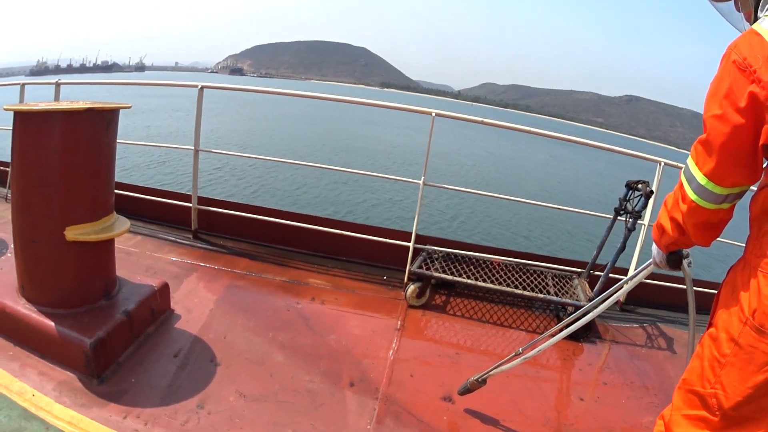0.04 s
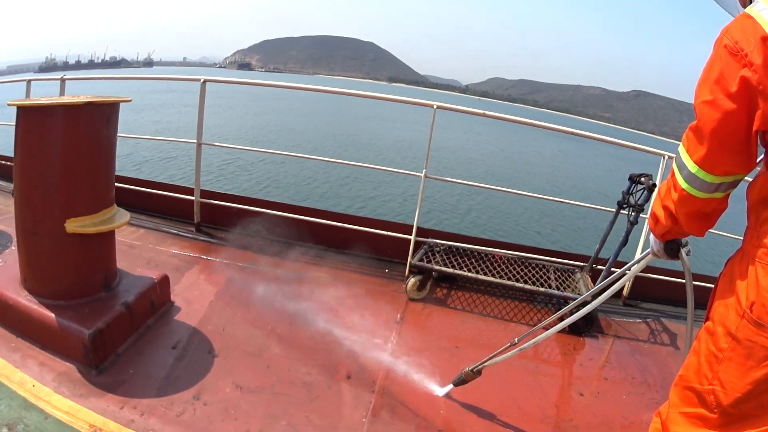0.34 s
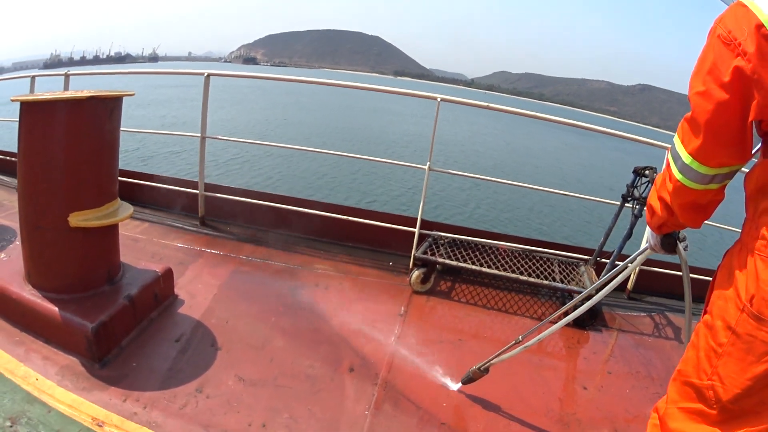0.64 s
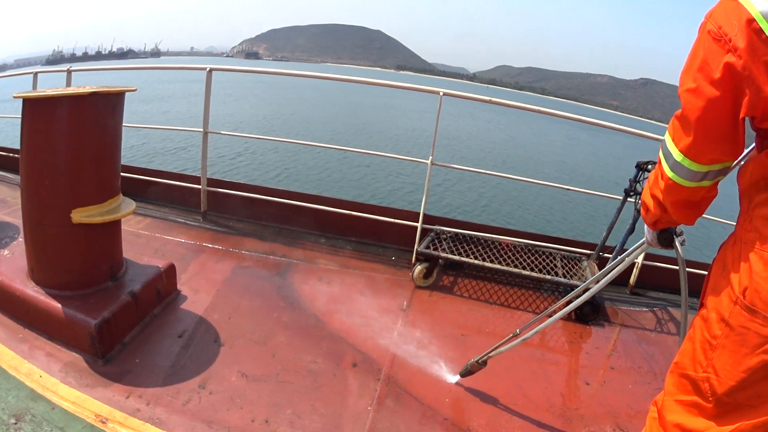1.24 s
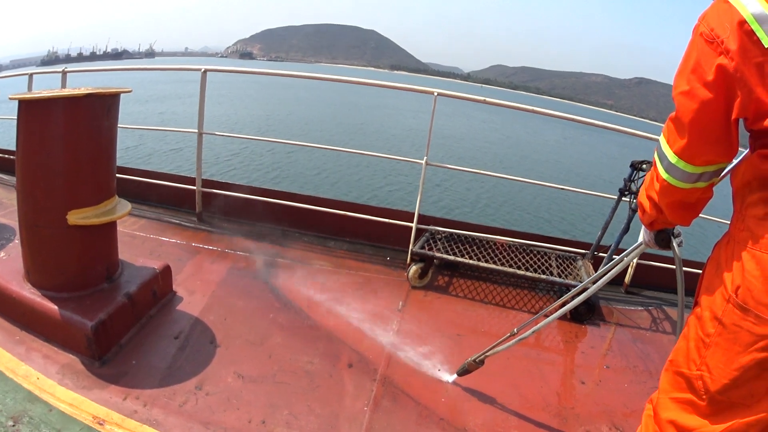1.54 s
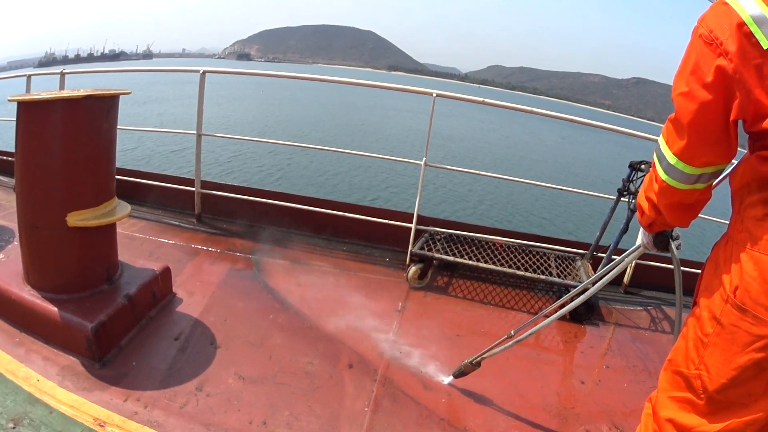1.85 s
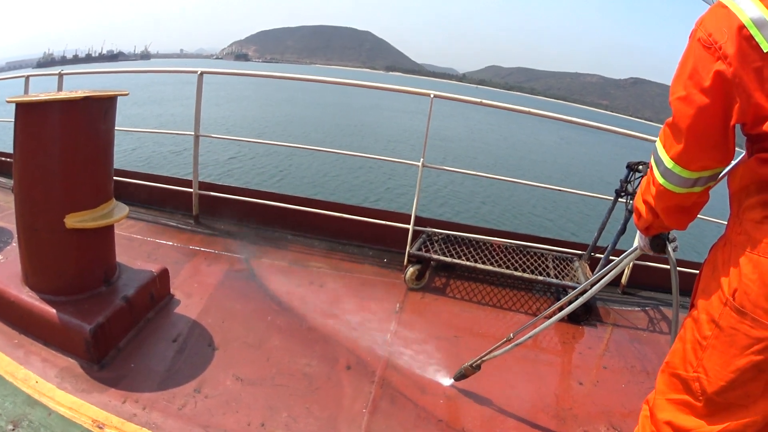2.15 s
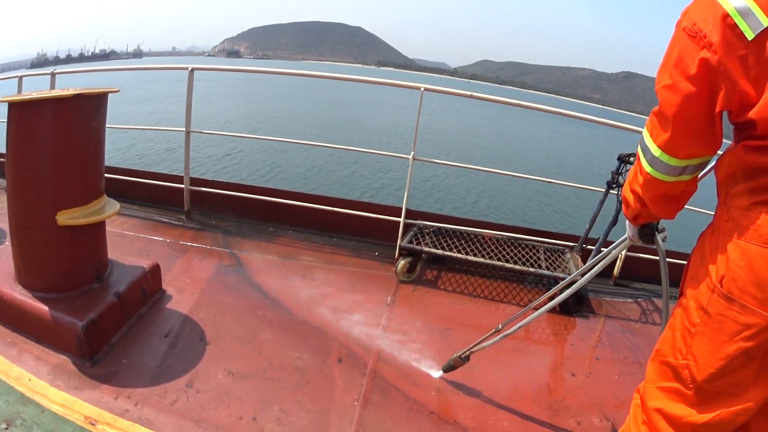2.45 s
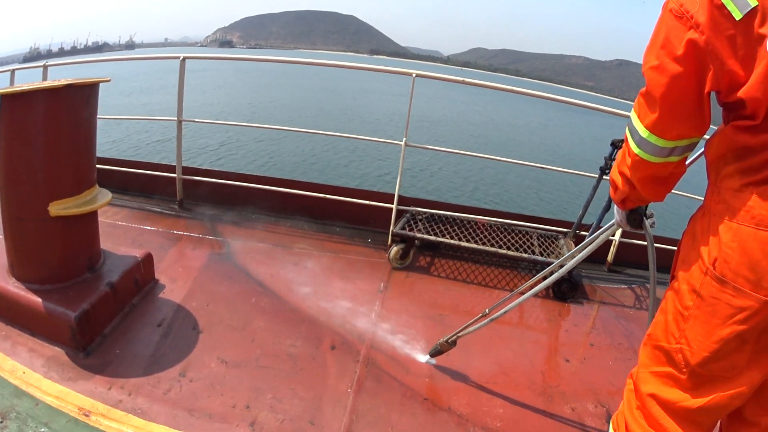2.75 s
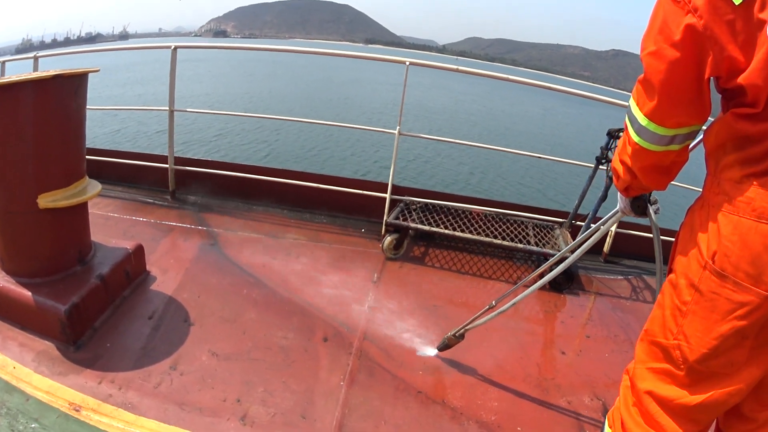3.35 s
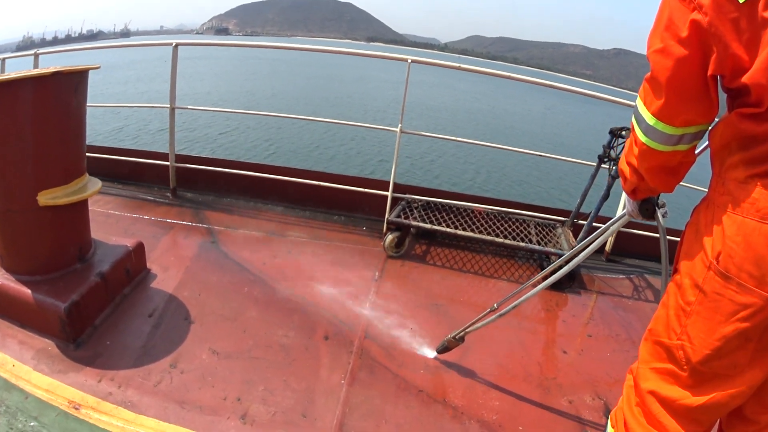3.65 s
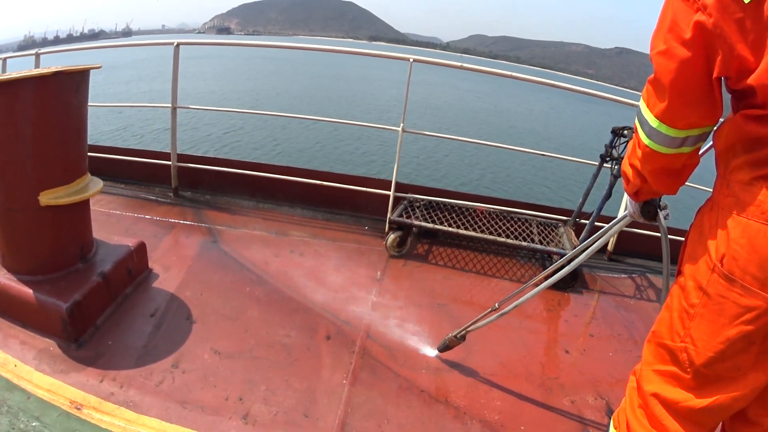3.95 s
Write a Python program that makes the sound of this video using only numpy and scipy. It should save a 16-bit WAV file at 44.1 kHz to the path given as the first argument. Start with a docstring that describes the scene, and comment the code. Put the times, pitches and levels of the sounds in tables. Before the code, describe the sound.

The loud, gritty hiss of a high-pressure nozzle starts suddenly, covering a brief low machinery drone. Close by on an open ship deck, the spray shifts in tone while its hollow roar on the steel swells and eases.

```python
"""A high-pressure lance on a steel ship deck, outdoors. First, machinery drones and hums alone.
At 0.3 s the valve opens: the jet hisses at once and roars where it strikes the plate,
and an automatic gain control ducks the drone as soon as the blast starts.
From then on a bright band shifts through the gritty hiss as the nozzle is moved,
while the hollow roar swells and eases. The jet is still running at the end."""
import sys
import numpy as np
from scipy import signal
from scipy.fft import rfft, irfft
from scipy.io import wavfile
from scipy.ndimage import uniform_filter1d

SR = 44100
rng = np.random.default_rng(int(sys.argv[2]) if len(sys.argv) > 2 else 0)


def materialize(psi):
    """Save the field psi as 16-bit PCM at rate SR to the path in sys.argv[1].

    A 1-D psi becomes a single channel; in a 2-D psi each row is a channel.
    """
    bounded = np.clip(np.atleast_2d(psi).T, -1, 1)
    quanta = np.round(bounded * 32767).astype(np.int16)
    wavfile.write(sys.argv[1], SR, quanta)


N = 176400
FRAME, HOP = 1024, 256  # samples
T = np.arange(N) / SR
HZ = np.fft.rfftfreq(FRAME, 1 / SR)
FRAME_S = np.arange(N // HOP + 5) * HOP / SR

# Tone of the jet's hiss: frequency_hz, relative_db
HISS_TONE = [(30, -45), (200, -35.5), (1200, -12), (1950, -14.5), (2750, -9.5), (3400, -6), (4600, -5),
             (5300, -3), (6300, -1.5), (7250, -0.5), (7900, -3), (8800, -3.5), (10000, -4.5), (11200, -10)]
# Narrow colours in the hiss: centre_hz, half_width_hz, gain_db
HISS_PEAKS = [(4800, 68, 2), (5650, 64, 1.5), (6320, 120, 2.2), (7170, 100, 1.5), (7000, 160, -1),
              (8870, 50, 1.8)]
# Fader and treble moves on the hiss: time_s, relative_db, treble_db
HISS_MOVES = [(.3, -5, 3.5), (.52, 1, -3), (.7, -0.5, -1.5), (.8, -0.5, 1), (1, 1.5, 0), (1.18, 2.3, -3.5),
              (1.65, .8, -1.2), (2.3, 1.5, -1.5), (3, -0.2, 0.6), (3.72, 1.5, 0), (3.87, -0.5, 2),
              (4, 2, 0.5)]
# Bright band between nozzle and plate: time_s, centre_hz, half_width_hz, gain_db
BRIGHT_SWEEP = [(.3, 4500, 900, 4.5), (.42, 3780, 766, 8), (.54, 3480, 630, 9.5), (.68, 3980, 500, 6),
                (.8, 3400, 450, 3.5), (1, 4020, 400, 1), (1.18, 4180, 270, 5.5), (1.4, 4180, 300, 3),
                (1.65, 4220, 300, 5.5), (2.3, 4060, 170, 2), (2.85, 3860, 150, 5), (3.35, 3800, 160, 5.5),
                (3.64, 3850, 160, 2.5), (3.85, 4070, 200, 10), (4, 4080, 200, 0)]
# Band just above it, by turns a dip and a lift: time_s, centre_hz, half_width_hz, gain_db
UPPER_SWEEP = [(.3, 5900, 300, 1.5), (.5, 5600, 350, -1.5), (.7, 5260, 300, 3), (.87, 4660, 170, -6.5),
               (1.05, 4700, 170, 2), (1.15, 5300, 250, -4.5), (1.5, 5200, 200, 0.5), (2.6, 4500, 200, 0),
               (3.2, 4500, 200, -2), (3.9, 4800, 220, -5)]
# Tone of the jet's roar on the plate: frequency_hz, relative_db
ROAR_TONE = [(20, -45), (45, -17), (170, -13), (400, -13), (620, -4.5), (900, -1), (1100, -6), (1210, -14),
             (1500, -7.5), (1980, -12), (2300, -8.5), (2750, -14), (5000, -22.5), (11200, -44)]
# Resonances that colour the roar: centre_hz, half_width_hz, gain_db
PLATE_RESONANCES = [(304, 24, 7.5), (546, 21.5, 9), (650, 11, 4.5), (872, 77, 3.5), (1056, 29.6, 10.5),
                    (1273, 25, 12), (1465, 39, 9.5), (1739, 116, 7), (2172, 78, 7), (2416, 26, 9.5),
                    (2650, 20, -1), (3057, 118, 12.5)]
# Fader and tone moves on the roar: time_s, level_db, upper_db, bass_db
ROAR_MOVES = [(.3, -15.5, 1, -10), (.45, -14, 3, 1), (.57, -8, -3, 1.5), (.72, -8.5, -3, 2), (.9, -8, 2, 1),
              (1.15, -10, -2, -2), (1.4, -12.5, 0.5, -10), (1.85, -13.5, -1, -8), (2.15, -11, 0.5, -1.5),
              (2.55, -11.5, 2, 3.5), (3.2, -12.5, 2, -1), (3.6, -12, .5, 0.5), (3.87, -12, 6, 1),
              (4, -12, 0, -7)]
# Tone of the machinery's rumble: frequency_hz, relative_db
DRONE_TONE = [(20, -40), (42, -1), (70, -0.5), (240, 1.5), (400, -1.5), (520, -2.5), (620, -4.5),
              (1000, -11.5), (1250, -13.5), (1500, -16.5), (2600, -21.5), (3200, -29), (6000, -39.5),
              (11000, -55)]
# Machinery hum: pitch_hz, level_db, waver_hz
HUM_TONES = [(73.6, -44, 3), (93, -40, 2), (147.5, -43.5, 4), (284, -36, 9.3), (415, -48, 7.7)]
# Stereo image of the noise layers: frequency_hz, left_right_correlation
STEREO_LIKENESS = [(30, 0.97), (125, 0.99), (250, 0.94), (560, 0.88), (1000, 0.91), (2000, 0.79),
                   (4000, 0.94), (11000, 0.95)]

OPEN_S, OPEN_RISE_S = 0.2916, 0.0091
HISS_DB, DRONE_DB = -2.5, -28
FLUTTER_DB, HISS_CHURN_DB, ROAR_CHURN_DB, HUM_THROB_DB = 0.094, 1.5, 1.24, 2.5  # rms depths
GRIT_PER_S, GRIT_SPREAD_DB, GRIT_SHARE = 4000, 2.5, 0.18  # grains striking the steel
ECHO_S, ECHO_DB, PAN_RIGHT_DB = .00445, -18, .65
DUCK_ABOVE_DB, DUCK_SLOPE, SENSE_S, RECOVER_DB_PER_S = -14.5, 0.91, 0.0016, 6


def jet():
    """The valve lets hiss and roar through; both flutter and reflect once off nearby steel."""
    valve = np.clip((T - OPEN_S) / OPEN_RISE_S, 0, 1)
    flutter = amp(FLUTTER_DB * wander(slow_hz=15, fast_hz=150))
    direct = valve * flutter * (spray_hiss() + plate_roar())
    echo = np.array([np.interp(T - ECHO_S, T, channel) for channel in direct])
    pan = amp([[-PAN_RIGHT_DB / 2], [PAN_RIGHT_DB / 2]])
    return (direct + amp(ECHO_DB) * echo) * pan


def spray_hiss():
    """Gritty spray, with two sweeping bands that follow the nozzle."""
    level_db, treble_db = curves(HISS_MOVES, FRAME_S[:, None])
    tone_db = colour(HISS_TONE) + peaks(HISS_PEAKS) + sweep(BRIGHT_SWEEP) + sweep(UPPER_SWEEP)
    tilt_db = treble_db * shelf(hz=7900, edge_hz=740)
    churn_db = HISS_CHURN_DB * churn(frames=14, bins=4)
    return amp(HISS_DB) * rush(tone_db + level_db + tilt_db + churn_db, GRIT_SHARE)


def plate_roar():
    """The hollow, resonant rush of the jet spreading over the plate."""
    _, upper_db, bass_db = curves(ROAR_MOVES, FRAME_S[:, None])
    tilt_db = upper_db * shelf(hz=1190, edge_hz=150) + bass_db * (1 - shelf(hz=400, edge_hz=80))
    tone_db = colour(ROAR_TONE) + peaks(PLATE_RESONANCES)
    churn_db = ROAR_CHURN_DB * churn(frames=12, bins=5)
    fader = amp(curves(ROAR_MOVES, T)[0])
    return fader * rush(tone_db + tilt_db + churn_db)


def grit(shape):
    """Grains striking steel: random clicks of uneven strength, rms 1."""
    clicks = (rng.random(shape) < GRIT_PER_S / SR) * rng.choice([-1, 1], shape)
    strength_db = GRIT_SPREAD_DB * np.minimum(rng.exponential(1, shape), 4)
    return unit(clicks * amp(strength_db))


def machinery():
    """The background bed: a steady rumble with a few wavering, throbbing tones."""
    hum = np.zeros(N)
    for pitch_hz, level_db, waver_hz in HUM_TONES:
        throb = amp(HUM_THROB_DB * wander(slow_hz=4, fast_hz=17))
        hz = pitch_hz + waver_hz * wander(slow_hz=3.06, fast_hz=25.4)
        hum += amp(level_db) * unit(throb * np.sin(2 * np.pi * np.cumsum(hz) / SR))
    return hum + amp(DRONE_DB) * rush(colour(DRONE_TONE))


def rush(eq_db, grit_share=0):
    """Stereo noise and optional grit through a still or moving EQ, scaled to rms 1."""
    shape = (2, (len(FRAME_S) - 1) * HOP)
    grains = np.sqrt(grit_share) * grit(shape)
    noise = np.sqrt(1 - grit_share) * rng.standard_normal(shape)
    _, _, spectra = signal.stft(noise + grains, nperseg=FRAME, noverlap=FRAME - HOP)
    mid, side = spectra.transpose(0, 2, 1)
    likeness = colour(STEREO_LIKENESS)
    mid, side = mid * np.sqrt(1 + likeness), side * np.sqrt(1 - likeness)
    shaped = np.array([mid + side, mid - side]) * amp(eq_db)
    _, stereo = signal.istft(shaped.transpose(0, 2, 1), nperseg=FRAME, noverlap=FRAME - HOP)
    return unit(stereo[:, :N])


def churn(frames, bins):
    """Turbulence: random patches in time and frequency, rms 1."""
    noise = rng.standard_normal((len(FRAME_S), len(HZ)))
    return unit(uniform_filter1d(uniform_filter1d(noise, frames, axis=0), bins, axis=1))


def wander(slow_hz, fast_hz):
    """Random drift of rms 1, strongest at its slow end."""
    hz = np.fft.rfftfreq(N, 1 / SR)
    weight = hz / (hz + slow_hz) ** 1.5 / (1 + (hz / fast_hz) ** 4)
    return unit(irfft(rfft(rng.standard_normal(N)) * weight, N))


def sweep(rows):
    """The boost or cut in dB of one moving EQ bell."""
    hz, width_hz, db = curves(rows, FRAME_S[:, None])
    return db * bell(hz, width_hz)


def peaks(rows):
    """The summed gain in dB of stationary EQ bells."""
    return sum(db * bell(hz, width_hz) for hz, width_hz, db in rows)


def bell(hz, width_hz):
    """An EQ bell of height 1."""
    return np.exp(-.5 * ((HZ - hz) / width_hz) ** 2)


def shelf(hz, edge_hz):
    """A high shelf rising smoothly from 0 to 1."""
    return .5 + .5 * np.tanh((HZ - hz) / edge_hz)


def colour(points):
    """Reads a spectrum table at every frequency bin."""
    hz, value = np.transpose(points)
    return np.interp(np.log(HZ + 1), np.log(hz + 1), value)


def curves(rows, t):
    """Reads each automation lane of a table at the times t."""
    time_s, *lanes = np.transpose(rows)
    return [np.interp(t, time_s, lane) for lane in lanes]


def amp(db):
    """Decibels to gain."""
    return 10 ** (np.asarray(db) / 20)


def unit(x):
    """Scales to rms 1."""
    return x / np.sqrt(np.mean(x ** 2) + 1e-20)


def scene():
    """The jet over the machinery."""
    return jet() + machinery()


def record(dry):
    """A 30 Hz low cut, gain control that ducks in milliseconds and recovers slowly, an 11 kHz high cut."""
    dry = signal.sosfilt(signal.butter(3, 30, "high", fs=SR, output="sos"), dry)
    pole = np.exp(-1 / (SENSE_S * SR))
    power = signal.lfilter([1 - pole], [1, -pole], (dry ** 2).mean(0))
    release_db = RECOVER_DB_PER_S * T
    held_db = np.maximum.accumulate(10 * np.log10(power + 1e-12) + release_db) - release_db
    ducked = dry * amp(-DUCK_SLOPE * np.maximum(held_db - DUCK_ABOVE_DB, 0))
    high_cut = signal.firwin(1023, 11090, window=("kaiser", 9), fs=SR)
    return signal.oaconvolve(ducked, high_cut[None], "same", axes=1)


dry = scene()
out = record(dry)
materialize(out)
```